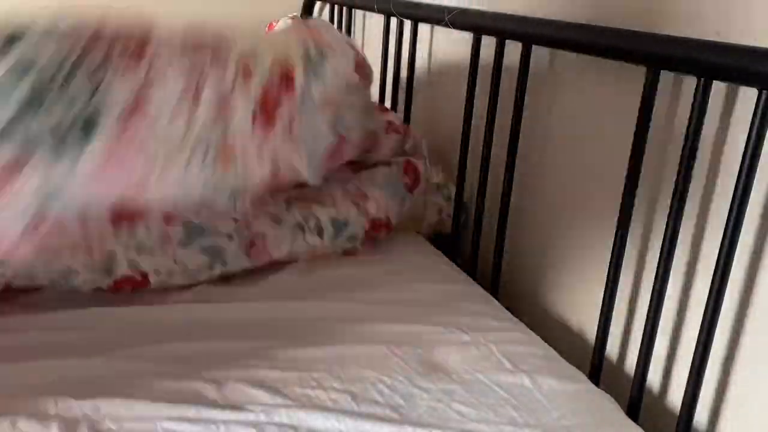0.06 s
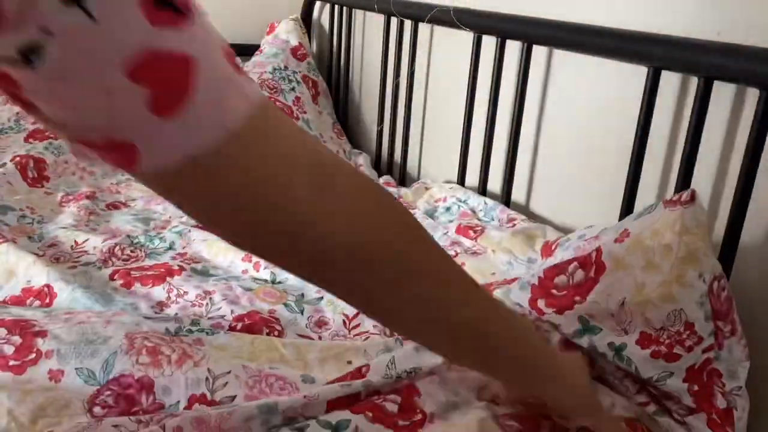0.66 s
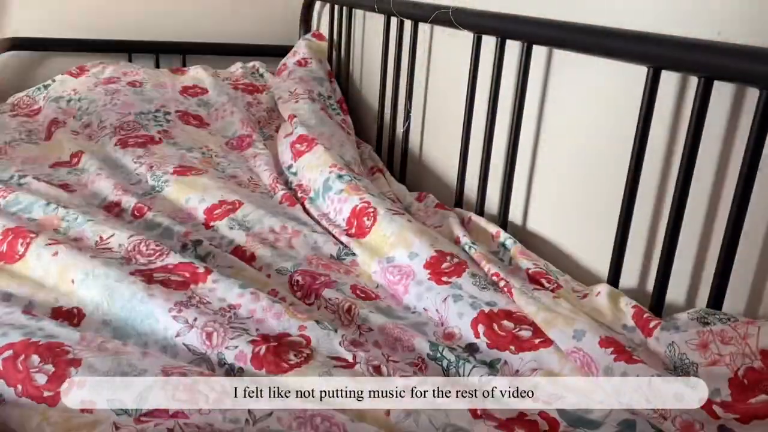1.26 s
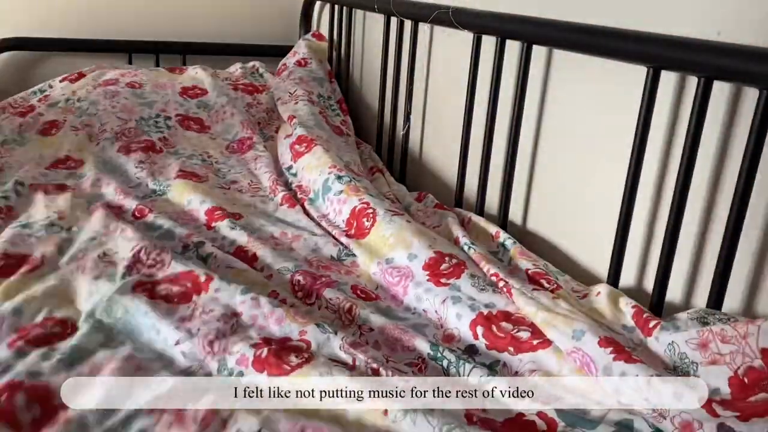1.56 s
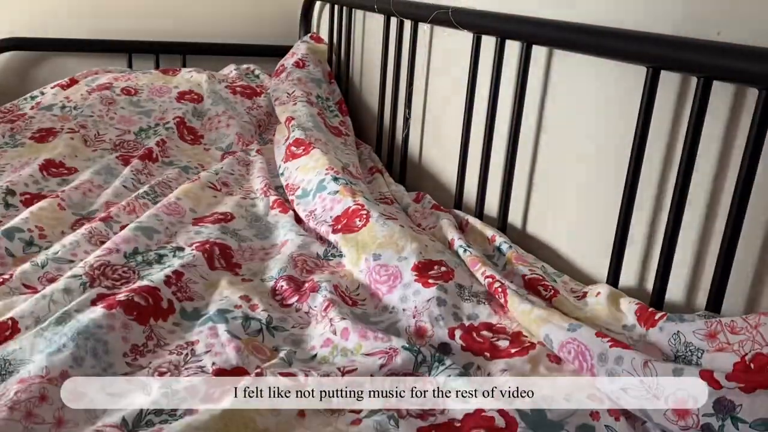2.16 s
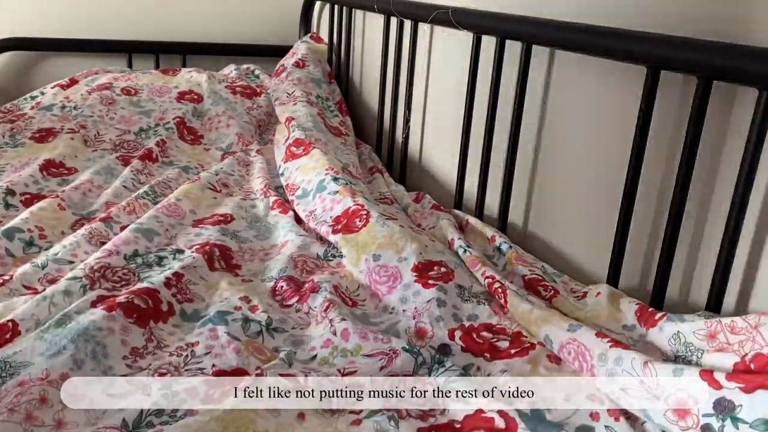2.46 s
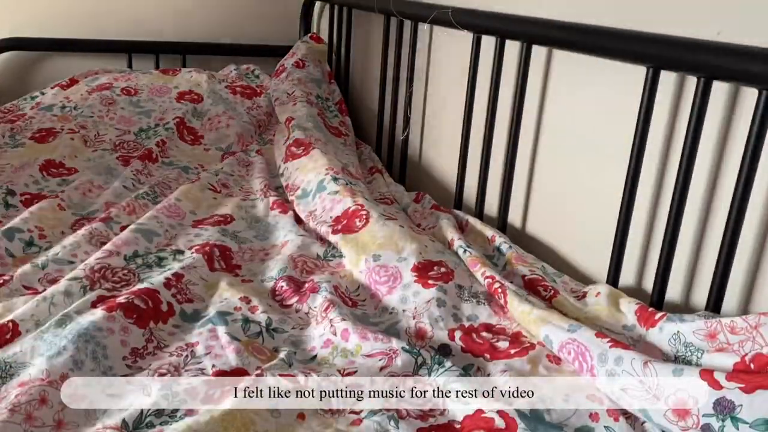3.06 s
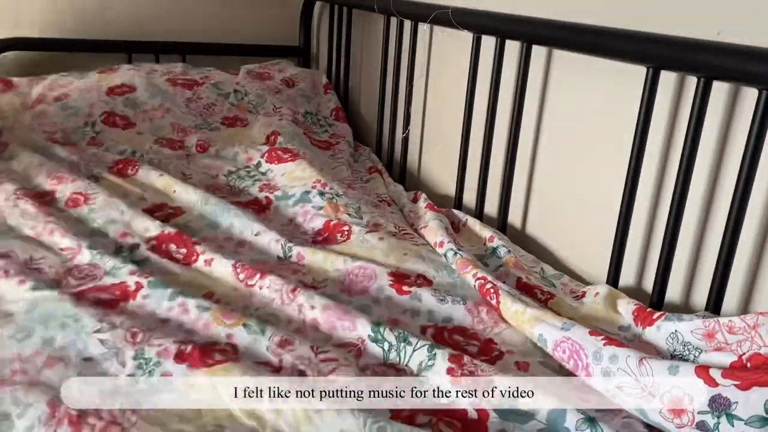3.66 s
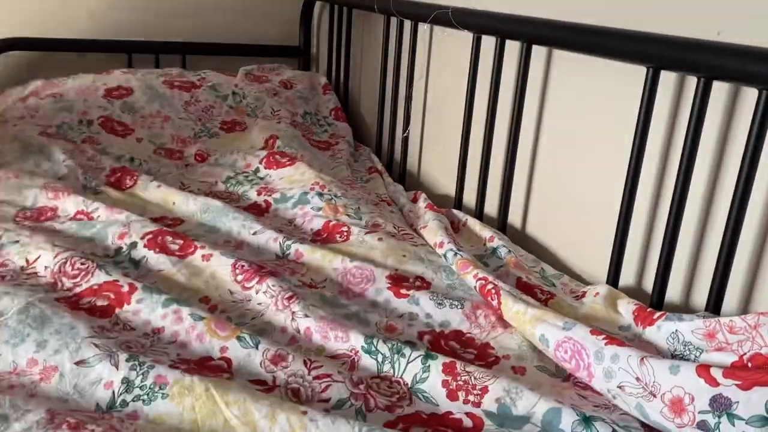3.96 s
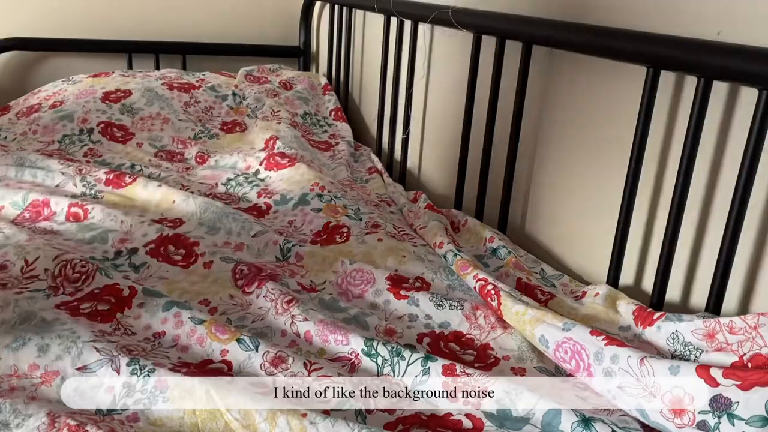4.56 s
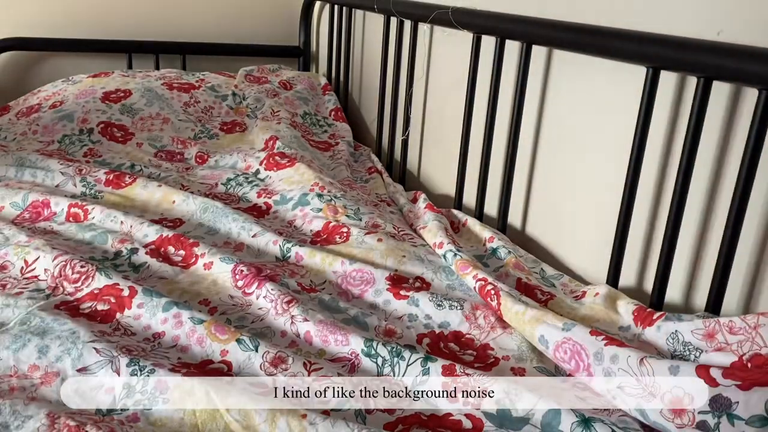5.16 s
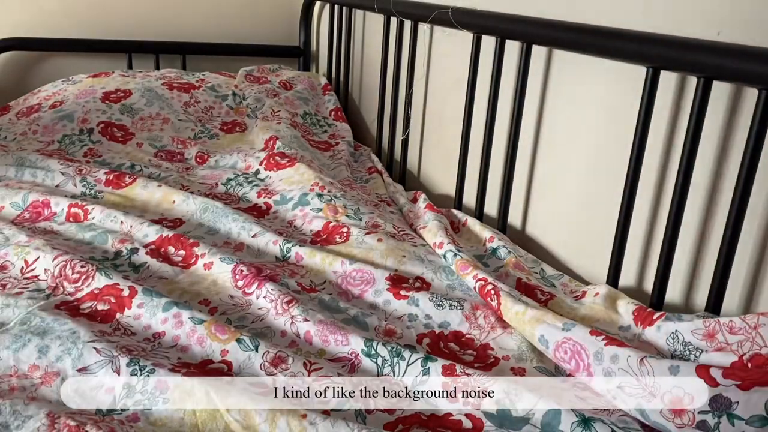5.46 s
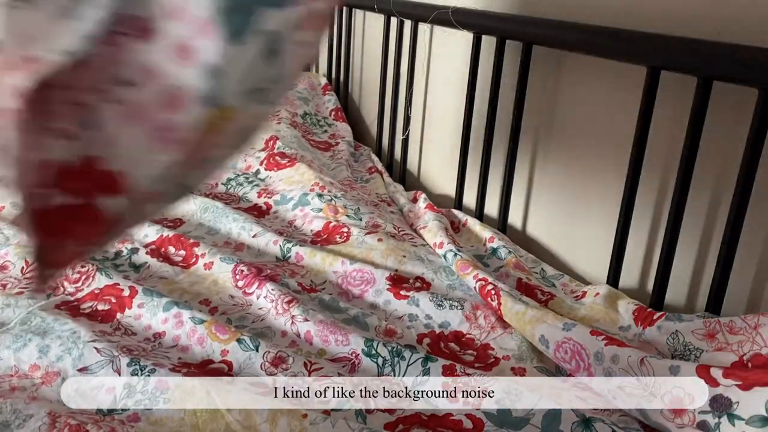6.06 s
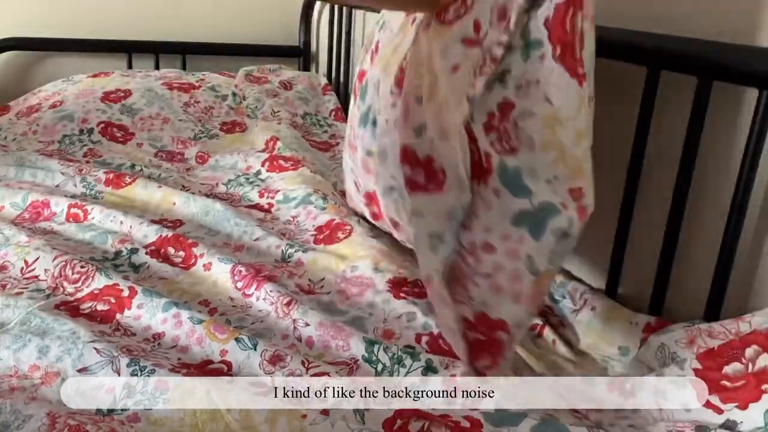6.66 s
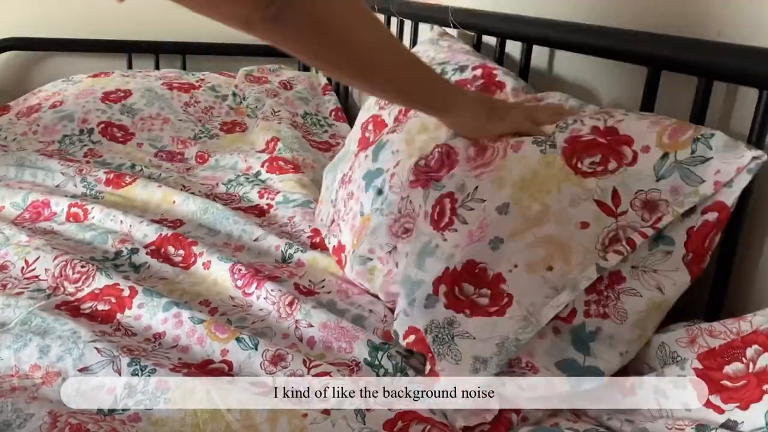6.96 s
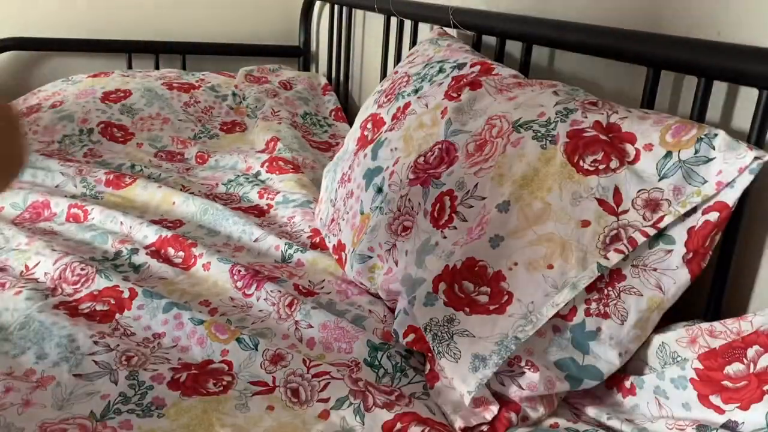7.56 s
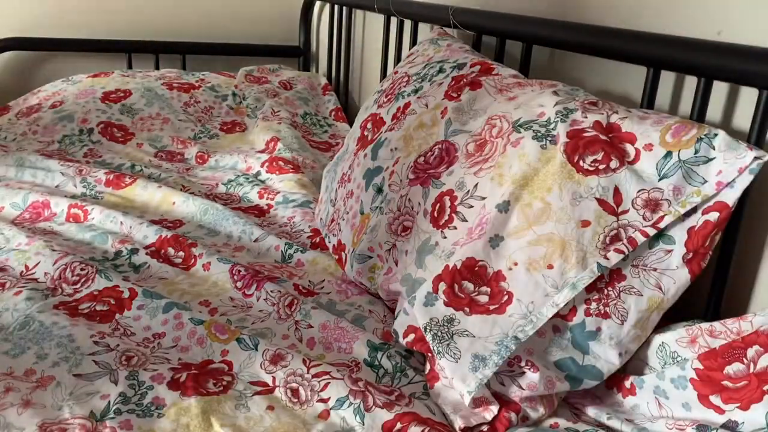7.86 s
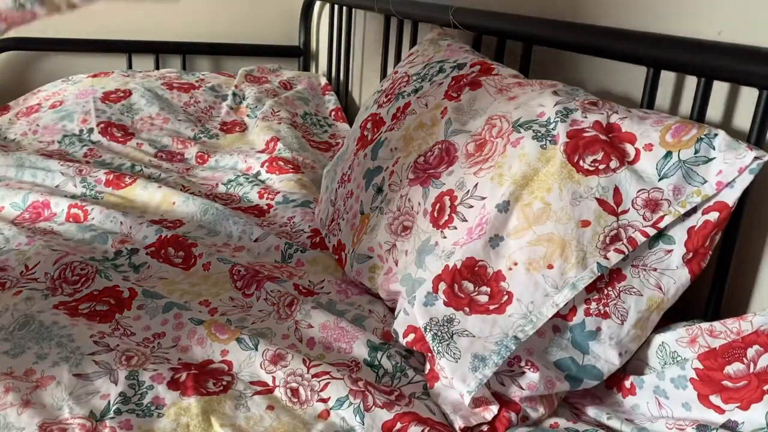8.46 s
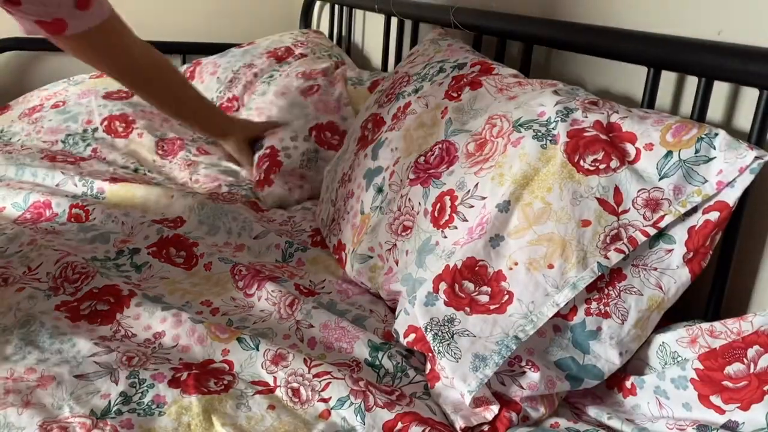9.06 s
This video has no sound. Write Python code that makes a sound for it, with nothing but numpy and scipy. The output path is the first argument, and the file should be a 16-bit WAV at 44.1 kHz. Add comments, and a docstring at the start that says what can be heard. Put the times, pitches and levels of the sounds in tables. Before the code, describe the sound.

Close cotton bedding swishes and crumples as a bed is made, pillows landing softly between low footsteps in a small room.

```python
"""In a quiet bedroom, a cotton duvet is pulled straight and smoothed by hand, then pillows are dropped on it.
Folds buckle with a dull crumple, cloth rubs on cloth, and the sliding weave hisses. Slack cloth flaps,
creases snap taut and bedding lands with soft thumps. The deeper thumps are footsteps on the floor that
make the small room boom. The bed's metal bars clink, and a faint, distant hum comes and goes."""
import sys
import numpy as np
from scipy import signal
from scipy.fft import rfft, irfft
from scipy.io import wavfile

SR = 44100
rng = np.random.default_rng(int(sys.argv[2]) if len(sys.argv) > 2 else 0)


def unload_audio(sound):
    """Save the sound as a 16-bit wav file, at the path given as the first command line argument."""
    columns = np.transpose(np.atleast_2d(sound))
    # keep every value between -1 and 1, then stretch to whole-number steps
    steps = np.round(np.clip(columns, -1, 1) * 32767)
    wavfile.write(sys.argv[1], SR, steps.astype(np.int16))


N = 411012


def from_db(db):
    """Turn decibels into a gain to multiply by."""
    return 10 ** (np.asarray(db) / 20)


def unit_level(x):
    """Scale a signal to an average power of 1."""
    return x / np.sqrt(np.mean(x ** 2) + 1e-20)


def gain_curve(rows):
    """Join points of (seconds, dB) into one gain for every sample."""
    s, db = np.transpose(rows)
    return from_db(np.interp(np.arange(N) / SR, s, db))


def drift(turns_per_s):
    """A randomly wandering curve with a typical size of 1."""
    points = rng.standard_normal(int(N / SR * turns_per_s) + 2)
    return unit_level(np.interp(np.arange(N) / SR * turns_per_s, np.arange(len(points)), points))


def filtered(x, spectrum, unit_power=True, size=4096):
    """Colour a sound with points of (Hz, dB). With unit_power, only their shape counts, not their level."""
    hz, db = np.transpose(spectrum)
    curve_db = np.interp(np.log(np.fft.rfftfreq(size, 1 / SR) + 1), np.log(hz), db)
    # a minimum-phase filter: it never rings before the sound arrives
    cepstrum = irfft(np.log(from_db(curve_db)))
    cepstrum[1:size // 2] *= 2
    cepstrum[size // 2 + 1:] = 0
    response = irfft(np.exp(rfft(cepstrum)))
    if unit_power:
        response = response / np.linalg.norm(response)
    return signal.oaconvolve(x, response[None], axes=-1)[:, :N]


def resonance(x, hz, width_hz):
    """Let through a band around one pitch; the narrower it is, the longer it rings."""
    r = np.exp(-np.pi * width_hz / SR)
    feedback = [1, -2 * r * np.cos(2 * np.pi * hz / SR), r * r]
    return signal.lfilter(np.array([1, 0, -1]) * (1 - r * r) / 2, feedback, x + 1e-18)


def add(track, s, sound):
    """Mix a sound into a track, starting at s seconds."""
    start = max(round(s * SR), 0)
    track[..., start:start + sound.shape[-1]] += sound[..., :N - start]


def swell(s, rise_s, lead=0.4206, size=12000):
    """A soft contact: pressure builds for rise_s, then lets go. Returns its start time and its force."""
    age = np.arange(size) / SR / max(rise_s, 1e-4)
    return s - lead * rise_s, (age * np.exp(1 - age)) ** 2


def gesture(start_s, attack_s, length_s, sag_db=6.5, release_db_per_s=388, peak_share=0.27, size=26000):
    """One movement swells, slows a little and dies away. Returns the samples it covers and their gain."""
    first = max(round(start_s * SR), 0)
    age = np.arange(min(size, N - first)) / SR
    rise = np.sin(np.pi / 2 * np.minimum(age / max(attack_s, 1e-3), 1)) ** 2
    off_peak = (np.minimum(age / length_s, 1) - peak_share) / (1 - peak_share)
    fall_db = sag_db * off_peak ** 2 + release_db_per_s * np.maximum(age - length_s, 0)
    return slice(first, first + len(age)), rise * from_db(-fall_db)


# How much the two ears differ. Each row: frequency in Hz, gain of their difference in dB.
EAR_DIFFERENCE = [(60, -18), (125, -18.5), (250, -9.5), (500, -11.5), (1000, -3), (2000, -0.5), (4000, -2),
                  (8500, -5), (12000, -7)]

def to_ears(pair):
    """Turn a shared part and a difference into left and right; the bass is nearly alike in both."""
    side = filtered(pair[1:], EAR_DIFFERENCE, unit_power=False)
    return pair[:1] + side * [[1], [-1]]


# The colour of the room's quiet air. Each row: frequency in Hz, relative level in dB.
AIR_COLOUR = [(25, -38.5), (96, 3.5), (140, 2), (209, -6), (331, -8.5), (410, -20.5), (800, -31.5),
              (1050, -31), (1300, -29), (3440, -39.5), (11800, -55), (13200, -44), (15500, -62)]
# The tones of a distant hum. Each row: pitch in Hz, relative level in dB.
HUM_PITCHES = [(334, -7.5), (500.6, -7), (667.5, 1.5), (834.4, 3), (1227, -7)]
# How the hum comes and goes. Each row: time in seconds, level in dB.
HUM_LEVELS = [(6.6, -99), (7.1, -88.5), (7.9, -85.5), (8.3, -99)]

def background(air_db=-70.5, hum_width_hz=6):
    """The quiet air of the bedroom, with a thin, wavering hum in it."""
    air = from_db(air_db) * filtered(rng.standard_normal((2, N)), AIR_COLOUR)
    hum = sum(from_db(db) * unit_level(resonance(rng.standard_normal((2, N)), hz, hum_width_hz))
              for hz, db in HUM_PITCHES)
    return to_ears(air + hum * gain_curve(HUM_LEVELS))


def wall_echoes(x, level_db=-10.5, fade_s=0.041, first_echo_s=0.0061, band_hz=(250, 5000), size=16000):
    """The close walls throw back short, dull reflections."""
    t = np.arange(size) / SR
    echoes = rng.standard_normal((2, size)) * from_db(-60 * t / fade_s) * (t > first_echo_s)
    echoes /= np.linalg.norm(echoes, axis=1, keepdims=True)
    echoes = signal.sosfilt(signal.butter(1, band_hz, "band", fs=SR, output="sos"), echoes)
    return from_db(level_db) * signal.oaconvolve(x, echoes, axes=-1)[:, :N]


# The notes the room rings at. Each row: pitch in Hz, gain in dB, seconds to fade by 60 dB.
ROOM_NOTES = [(96.1, 6.5, 0.43), (158.5, -6, .18), (276.7, -3, 0.06), (312.5, -0.5, 0.12),
              (419.5, -10.5, 0.12), (520, -11, 0.12), (906, -8, 0.14)]

def room_boom(push):
    """Standing waves between the walls ring on after each push on the air."""
    return sum(from_db(db) * resonance(push, hz, np.log(1000) / (np.pi * fade_s))
               for hz, db, fade_s in ROOM_NOTES)


# The colour of the rumble after a footstep. Each row: frequency in Hz, relative level in dB.
SETTLING_COLOUR = [(30, -49), (52, -6.5), (85, 3.5), (150, -2), (300, -25), (600, -47), (2000, -57)]

def settling(push, level_db=3.5, fade_s=0.63):
    """Each footstep leaves a loose, low rumble that dies away."""
    decay = from_db(-60 / (fade_s * SR))
    unrest = signal.lfilter([1 - decay], [1, -decay], np.abs(push))
    return from_db(level_db) * unrest * filtered(rng.standard_normal((1, N)), SETTLING_COLOUR)[0]


# Bedding knocks the bed's metal bars. Each row: start in seconds, level in dB.
BAR_KNOCKS = [(1.008, -53), (5.076, -50), (7.206, -46.5)]
# The notes of the bars. Each row: pitch in Hz, relative level in dB, seconds to fade by 60 dB.
BAR_NOTES = [(2370, -8.5, 0.056), (3830, -11.5, 0.061), (4200, -14, 0.054)]

def bed_bars(size=9000):
    """Each knock sets the bars ringing briefly, muffled by the bedding."""
    out, age = np.zeros((2, N)), np.arange(size) / SR
    for s, db in BAR_KNOCKS:
        for hz, note_db, fade_s in BAR_NOTES:
            phases = 2 * np.pi * rng.random((2, 1))
            add(out, s, from_db(db + note_db - 60 * age / fade_s) * np.sin(2 * np.pi * hz * age + phases))
    return out


# Faint, high squeaks of cloth. Each row: start in seconds, length in seconds, level in dB, pitch in Hz.
CLOTH_SQUEAKS = [(5.396, .04, -78.5, 8550), (6.004, 0.023, -70, 5600)]

def squeaks(width_hz=330):
    """Slipping cloth settles briefly on one high pitch."""
    out = np.zeros((2, N))
    for s, length_s, db, hz in CLOTH_SQUEAKS:
        span, gain = gesture(s, attack_s=0.012, length_s=length_s, release_db_per_s=307)
        whistle = resonance(rng.standard_normal((2, len(gain))), hz, width_hz)
        out[:, span] += from_db(db) * gain * unit_level(whistle)
    return out


# A palm or a seam drags over the weave.
# Each row: start in seconds, length in seconds, level in dB, pitch in Hz, slips per second.
DRAGS = [(1.003, 0.013, -63, 3870, 970), (2.755, 0.058, -67.5, 1880, 1050), (3.297, .08, -80, 1200, 700),
         (3.594, 0.032, -67.5, 1320, 1100), (5.153, 0.037, -60, 2300, 500), (6.277, 0.044, -60, 6960, 900),
         (7.204, 0.017, -55.5, 3820, 820)]

def rasps(relative_width=0.2):
    """Dragged cloth sticks and slips in a gritty run of tiny catches, coloured by the stretched patch."""
    out = np.zeros((2, N))
    for s, length_s, db, hz, slips_per_s in DRAGS:
        span, gain = gesture(s, attack_s=0.0072, length_s=length_s)
        slips = (rng.random(len(gain)) < slips_per_s / SR) * rng.standard_normal((2, len(gain)))
        grit = resonance(resonance(slips, hz, relative_width * hz), hz, hz)
        out[:, span] += from_db(db) * gain * unit_level(grit)
    return out


# Slack cloth flaps, and creases snap taut.
# Each row: time in seconds, level in dB, pitch in Hz, swell time in seconds.
SLACK_FLAPS = [(0.046, -36.5, 624, 0.0025), (0.102, -37, 472, 0.0037), (0.128, -34, 374, 0.0056),
               (0.195, -45, 420, 0.0049), (0.589, -49, 560, 0.0042), (0.792, -41.5, 403, 0.0076),
               (1.006, -39.5, 485, 0.0065), (2.497, -49, 268, 0.016), (2.85, -49, 274, 0.018),
               (3.312, -53.5, 390, .016), (3.954, -43, 342, 0.01205), (4.124, -43, 280, 0.0077),
               (4.228, -52, 328, 0.01), (4.499, -43, 313, 0.0058), (5.029, -36.5, 770, 0.0024),
               (5.824, -46, 714, 0.0042), (6.263, -45.5, 870, 0.0084), (6.307, -34.5, 321, 0.011),
               (6.4, -47, 596, 0.011), (6.456, -45.5, 577, 0.0099), (6.522, -43, 650, 0.0022),
               (7.154, -44.5, 735, 0.0024), (7.169, -46, 605, 0.0032), (7.73, -50.5, 790, 0.027),
               (8.422, -41, 573, 0.0086), (8.565, -34, 430, 0.0038), (8.634, -52, 520, 0.015),
               (8.728, -44, 386, 0.0034), (8.756, -39, 450, 0.011), (8.914, -40.5, 274, 0.011),
               (9.204, -43, 366, 0.009)]
CREASE_SNAPS = [(0.779, -48, 1330, 0.0024), (1.271, -57, 1080, 0.0033), (1.765, -52, 1730, 0.0027),
                (5.028, -38, 2660, 0.0013), (5.077, -36, 3900, 0.001), (5.088, -42, 3000, .0008),
                (5.104, -43, 2300, .0011), (5.824, -41.5, 1400, 0.007), (6.492, -36, 4650, 0.00042),
                (7.619, -52, 1260, 0.0037), (8.416, -43.5, 1350, 0.0022), (8.429, -42, 1300, 0.0031),
                (8.564, -44, 1720, 0.002), (8.758, -39.5, 1760, .0061)]
# The colour of the slapping edge in each. Each row: frequency in Hz, relative level in dB.
FLAP_COLOUR = [(30, -66), (100, 3), (300, 12.5), (800, -8), (1500, -19), (3000, -17), (8000, -30),
               (15000, -35)]
SNAP_COLOUR = [(50, -41), (300, 1), (800, 30), (1500, 10), (3500, -14), (6000, -33), (10000, -22),
               (15000, -10)]

def cloth_hits(hits, edge_colour, hollow_db, edge_db, relative_width):
    """Each hit has a hollow pitch from the pocket of cloth that moves, and a broad slap from its edge."""
    hollows, edges = np.zeros((2, N)), np.zeros(N)
    for s, db, hz, rise_s in hits:
        start, force = swell(s, rise_s)
        air = rng.standard_normal((2, 2 * len(force)))
        pocket = resonance(resonance(air, hz, relative_width * hz), hz, hz)
        hollow = force * pocket[:, len(force):]   # the second half, where the ring has built up
        hollow *= np.linalg.norm(force) / np.linalg.norm(hollow, axis=1, keepdims=True)
        add(hollows, start, from_db(db) * hollow)
        add(edges, start, from_db(db) * force)
    slap = filtered(rng.standard_normal((2, N)), edge_colour)
    return from_db(hollow_db) * hollows + from_db(edge_db) * edges * slap


# Soft thumps: bedding lands, and the deeper ones are footsteps on the floor that make the room boom.
# Each row: time in seconds, level in dB, pitch in Hz, swell time in seconds.
SOFT_THUMPS = [(0.127, -33, 151, 0.011), (0.196, -45.5, 151, 0.017), (0.44, -49.5, 93.5, 0.0085),
               (1.009, -31, 136.7, 0.0076), (1.662, -43, 146.8, 0.02), (2.204, -47, 132, 0.0069),
               (2.366, -51.5, 134, 0.0072), (2.484, -34.5, 94.5, 0.017), (2.584, -48.5, 98.6, 0.014),
               (2.649, -49, 95.4, 0.019), (2.828, -30, 90.5, 0.02), (2.847, -42, 152, 0.016),
               (3.658, -46, 160, 0.009), (3.963, -50, 160, 0.0086), (4.047, -54, 103.5, 0.028),
               (4.14, -43.5, 105.5, 0.023), (4.503, -42, 116.3, 0.018), (4.589, -47.5, 97, 0.014),
               (4.779, -47.5, 154, 0.02), (5.083, -42, 195, 0.0123), (5.633, -49, 136, 0.014),
               (5.838, -30, 102, 0.0088), (6.31, -40, 278, 0.0079), (7.19, -48.5, 116, 0.011),
               (8.401, -50.5, 95.5, 0.019), (8.742, -49, 174, 0.015), (8.911, -39, 107.2, 0.02),
               (9.211, -42.5, 139, 0.014)]
# The colour of the puff of air in a thump. Each row: frequency in Hz, relative level in dB.
PUFF_COLOUR = [(25, -23), (55, -26), (120, 15), (290, 1), (450, -12), (800, -26), (1500, -34), (5000, -42)]

def thumps(wander=0.17, body_db=-1, octave_db=-16, heavy_below_hz=155, puff_db_per_octave=7.5):
    """Each thump is a few uneven heaves and a puff of air. Returns the sound of bedding and of floor."""
    padding, floor, puffs = np.zeros((2, N)), np.zeros(N), np.zeros(N)
    unevenness = drift(200)
    for s, db, hz, rise_s in SOFT_THUMPS:
        start, force = swell(s, rise_s)
        stiffness = 1 + wander * np.roll(unevenness, -round(s * SR))[:len(force)]
        phase = 2 * np.pi * np.cumsum(hz * stiffness) / SR
        # soft things stiffen as they are squeezed, which adds the octave at the height of the blow
        octave = from_db(octave_db) * force * np.cos(2 * phase)
        heave = from_db(db + body_db) * force * (np.sin(phase) + octave)
        # deeper thumps sound from the floor, higher ones from the bedding's padding
        heavy = 1 / (1 + (hz / heavy_below_hz) ** 10)
        add(padding[0], start, (1 - heavy) * heave)
        add(floor, start, heavy * heave)
        # shallow, higher blows squeeze out more air
        puff_db = -9.5 + puff_db_per_octave * np.log2(hz / 143)
        add(puffs, start, from_db(db + puff_db) * force)
    return padding + puffs * filtered(rng.standard_normal((2, N)), PUFF_COLOUR), floor


def among_folds(x, glance_db, path_s=0.0008, path_spread=0.3965, moves_per_s=7, count=3):
    """Sound also glances off the moving folds nearby, so its colour keeps shifting."""
    now, out = np.arange(N), x.copy()
    for k in range(count):
        delay = (k + 1) * path_s * SR * np.exp(path_spread * np.tanh(drift(moves_per_s)))
        delayed = np.array([np.interp(now - delay, now, channel) for channel in x])
        out += (-1) ** k * from_db(glance_db) * delayed
    return out


def friction(colour, catches_per_s, spread_db, grain_db, flutter_db, flutter_per_s, glance_db=-10.5):
    """Countless fibres slip as smooth noise; larger catches stand out as grains; the pressure flutters."""
    sizes = from_db(spread_db * np.minimum(rng.exponential(1, N), 4))
    caught = rng.random(N) < catches_per_s / SR
    catches = unit_level(sizes * caught * rng.standard_normal((2, N)))
    slips = rng.standard_normal((2, N)) + from_db(grain_db) * catches
    pressure = from_db(flutter_db * drift(flutter_per_s))
    return unit_level(filtered(among_folds(slips * pressure, glance_db), colour))


# The bedding stirs between movements. Each row: time in seconds, level in dB.
STIRRING = [(0.0, -64), (0.6, -85.5), (1.15, -74), (1.21, -89), (1.4, -79), (1.8, -85), (2.2, -92),
            (2.55, -82.5), (2.72, -89), (3.15, -90.5), (3.4, -80.5), (4.0, -88.5), (4.8, -89), (5.5, -88),
            (6.1, -84.5), (6.9, -81.5), (7.1, -91), (7.55, -92), (8.1, -82.5), (8.6, -74.5), (8.97, -77.5),
            (9.32, -78.5)]
# A hand bunches up folds. Each row: start in seconds, length in seconds, level in dB.
HAND_BUNCHES = [(0.0, 0.085, -51), (0.085, 0.074, -44), (0.157, 0.045, -46), (0.333, 0.034, -60),
                (0.574, 0.034, -57), (0.634, 0.11, -59.5), (0.772, 0.054, -51.5), (0.857, 0.071, -58.5),
                (0.998, 0.03, -44), (1.055, 0.13, -70), (1.254, 0.056, -58), (1.373, 0.13, -55),
                (1.46, 0.14, -63.5), (1.643, 0.028, -55), (1.769, 0.053, -57), (1.806, 0.048, -56),
                (2.56, 0.056, -62), (3.168, 0.041, -65.5), (3.29, 0.055, -60), (3.442, 0.031, -69),
                (3.596, 0.041, -59.5), (3.945, 0.057, -63.5), (4.124, 0.041, -59.5), (4.48, 0.14, -67),
                (5.007, 0.12, -54.5), (5.146, 0.14, -57.5), (5.817, 0.041, -49), (6.011, 0.022, -57),
                (6.262, 0.085, -50.5), (6.41, 0.12, -57.5), (6.649, 0.037, -63), (6.796, 0.095, -58.5),
                (7.148, 0.086, -58.5), (7.668, 0.14, -64.5), (7.856, 0.018, -59.5), (8.41, 0.03, -55),
                (8.574, 0.019, -59), (8.734, 0.044, -43.5), (9.03, 0.11, -58), (9.194, 0.051, -50.5)]
# Cloth strokes over cloth. Each row: start, fade-in and length in seconds, level of the hiss in dB,
# then the levels of the rub and of the sheen in dB above that hiss.
CLOTH_STROKES = [(0.0, 0.038, 0.064, -60.5, 3.5, -3), (0.073, 0.04, 0.093, -63.5, 10.5, -13),
                 (0.169, 0.031, 0.12, -66, 4, -1), (0.278, 0.067, 0.15, -63.5, -34, 8.5),
                 (0.413, 0.14, 0.12, -59, -16, 11), (0.54, 0.028, 0.22, -77, 7.5, 2),
                 (0.624, 0.052, 0.13, -72, 4, 3.5), (0.764, .02, 0.19, -73, 7.5, 1),
                 (0.994, 0.0087, 0.021, -68, 8, 0), (1.252, 0.028, 0.07, -75, -1, -4),
                 (1.372, 0.041, 0.084, -80, 8.5, -7), (1.429, 0.057, 0.23, -59, -9, 3.5),
                 (1.757, 0.0079, 0.078, -73, 5, 0), (1.844, 0.098, 0.16, -62.5, -19, 4.5),
                 (1.975, 0.058, 0.13, -71, -22, 13), (2.233, 0.052, .05, -85, -12, 12.5),
                 (2.383, 0.04, 0.074, -71.5, -23, 9.5), (2.571, 0.072, 0.06, -58.5, -25, 4.5),
                 (2.728, 0.055, 0.098, -67, 0.5, -4), (2.874, .014, 0.031, -69, 6.5, -22),
                 (3.031, 0.032, 0.089, -67, -17, 5), (3.169, 0.036, 0.1, -73.5, 3, -7),
                 (3.27, 0.03, 0.12, -80, 7, 3), (3.565, 0.051, 0.072, -68.5, 1.5, 1),
                 (3.815, 0.037, 0.064, -78.5, 0.5, 4), (3.959, 0.03, 0.032, -73.5, -4, 8.5),
                 (4.032, 0.014, 0.03, -75.5, -1.5, -14), (4.129, 0.025, 0.032, -67.5, 0, -0.5),
                 (4.218, 0.019, 0.02, -75.5, -16, 9), (4.335, 0.043, 0.12, -72.5, 0, -7),
                 (4.427, 0.097, 0.092, -64, -5.5, 6.5), (4.54, .02, 0.09, -74.5, -6, -3),
                 (4.94, 0.071, 0.28, -69.5, 0, 3), (5.028, 0.051, 0.12, -64.5, 3, 3.5),
                 (5.128, 0.025, 0.088, -63.5, 5, -3), (5.614, 0.017, 0.026, -64.5, -3, 0),
                 (5.811, 0.032, 0.068, -61, 2, 3), (6.144, 0.027, 0.14, -77.5, -6, 7),
                 (6.232, 0.08, 0.082, -61.5, 10, 12.5), (6.32, 0.017, 0.08, -69.5, -5, 9),
                 (6.403, 0.02, 0.14, -72, 5, 2), (6.62, 0.015, 0.06, -70, -9, 1),
                 (6.654, 0.0039, 0.01, -55, -0.5, 3), (6.674, 0.034, 0.088, -66, -2.5, 9.5),
                 (6.783, 0.019, 0.092, -69, 1, 0.5), (6.906, .03, 0.19, -79, -1.5, 0),
                 (7.113, 0.061, 0.13, -73, 8, 2), (7.192, 0.022, 0.047, -61.5, 2.5, -6),
                 (7.266, 0.041, 0.22, -79, -7, 6.5), (7.6, 0.033, 0.1, -76, 7.5, 0),
                 (7.681, .05, 0.11, -69, 11.5, -3), (7.792, 0.078, 0.1, -72, 10.5, -3),
                 (7.952, 0.019, 0.088, -72, -4.5, 0), (8.155, 0.018, 0.021, -69.5, 6, -1),
                 (8.248, .03, 0.081, -73.5, -2.5, -4), (8.328, 0.05, 0.082, -66.5, -6, 1),
                 (8.519, 0.072, 0.062, -58, -3.5, 6.5), (8.739, 0.042, 0.036, -59.5, 5.5, 3),
                 (9.091, 0.062, .06, -68.5, 11, 1), (9.232, 0.013, 0.022, -66.5, -4, 2)]

def handling(uneven_db=2, changes_per_s=18):
    """Hands bunch and stroke the stirring cloth. Returns four gains: crumple, rub, hiss and sheen."""
    stir = gain_curve(STIRRING) * from_db(uneven_db * drift(changes_per_s))
    balance_db = [11.5, -0.5, 0, -3]   # crumple, rub, hiss, sheen
    power = np.outer(from_db(balance_db), stir) ** 2
    for s, length_s, db in HAND_BUNCHES:
        span, gain = gesture(s, attack_s=0.0075, length_s=length_s, sag_db=1.5, release_db_per_s=352)
        power[0, span] += (from_db(db) * gain) ** 2
    for s, attack_s, length_s, db, rub_db, sheen_db in CLOTH_STROKES:
        span, gain = gesture(s, attack_s, length_s)
        power[1:, span] += np.outer(from_db([db + rub_db, db, db + sheen_db]), gain) ** 2
    return np.sqrt(power)


# The four colours of the rustle, from dull to bright. Each row: frequency in Hz, relative level in dB.
CRUMPLE_COLOUR = [(30, -44.5), (50, -16.5), (90, -2.5), (140, 8.5), (210, 2.5), (320, -2), (460, 0.5),
                  (700, 0.3), (1100, -15.5), (2000, -20.5), (5000, -54)]
RUB_COLOUR = [(50, -5.5), (350, 6), (800, 4.5), (1600, 0.5), (2600, 0.5), (4000, -6.5), (7000, -19),
              (15000, -51)]
HISS_COLOUR = [(1200, -28), (2800, -4), (4200, 3), (6500, 2.5), (10000, -1.5), (11500, -9), (15000, -13.5)]
SHEEN_COLOUR = [(5000, -34.5), (9000, -9), (10500, -8.5), (13000, -8.5), (16000, -7)]

def rustle():
    """Folds buckle low, layers rub in the middle, the weave hisses and the finest threads add a sheen."""
    crumple, rub, hiss, sheen = handling()
    folds = friction(CRUMPLE_COLOUR, catches_per_s=450, spread_db=2.5, grain_db=-4,
                     flutter_db=2.32, flutter_per_s=60)
    layers = friction(RUB_COLOUR, catches_per_s=600, spread_db=3.0, grain_db=-3.5,
                      flutter_db=-1.85, flutter_per_s=33)
    weave, threads = [friction(colour, catches_per_s=3300, spread_db=6.0, grain_db=-14.5,
                               flutter_db=0.8, flutter_per_s=74, glance_db=-7)
                      for colour in (HISS_COLOUR, SHEEN_COLOUR)]
    return crumple * folds + rub * layers + hiss * weave + sheen * threads


def scene():
    """Bedding close by, footsteps, the room around them, and a faint background."""
    landings, floor = thumps()
    push = from_db(-2) * floor   # footsteps on the floor push on the room's air
    flaps = cloth_hits(SLACK_FLAPS, FLAP_COLOUR, hollow_db=-7.5, edge_db=-14.5, relative_width=0.24)
    snaps = cloth_hits(CREASE_SNAPS, SNAP_COLOUR, hollow_db=-13.5, edge_db=-11, relative_width=0.26)
    cloth = rustle() + flaps + snaps + rasps() + squeaks() + bed_bars()
    bedding = to_ears(cloth + landings)
    rumble = floor + settling(push) + room_boom(push + cloth[0])
    return bedding + rumble + wall_echoes(bedding) + background()


# How the two microphones differ. Each row: frequency in Hz, level of the left above the right in dB.
LEFT_OVER_RIGHT = [(60, -1.5), (200, -0.6), (380, -1), (700, 0.5), (1290, 1.5), (2380, 0), (4400, 1.3),
                   (8120, 3), (15000, 0)]

def record(dry, bass_cut_hz=42, treble_cut_hz=15950):
    """The two microphones differ slightly in colour; the lowest rumble and the highest treble are cut."""
    left = filtered(dry[:1], [(hz, db / 2) for hz, db in LEFT_OVER_RIGHT], unit_power=False)
    right = filtered(dry[1:], [(hz, -db / 2) for hz, db in LEFT_OVER_RIGHT], unit_power=False)
    high_pass = signal.butter(4, bass_cut_hz, "high", fs=SR, output="sos")
    ears = signal.sosfilt(high_pass, np.vstack([left, right]))
    low_pass = signal.firwin(401, treble_cut_hz, fs=SR)
    return signal.oaconvolve(ears, low_pass[None], mode="same", axes=-1)


dry = scene()
out = record(dry)
unload_audio(out)
```